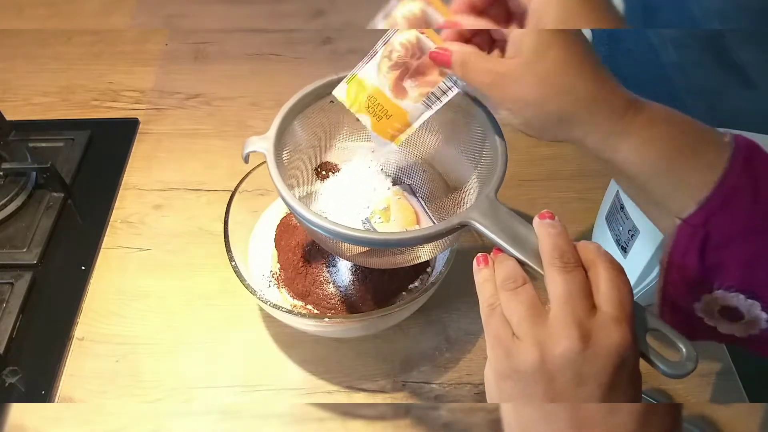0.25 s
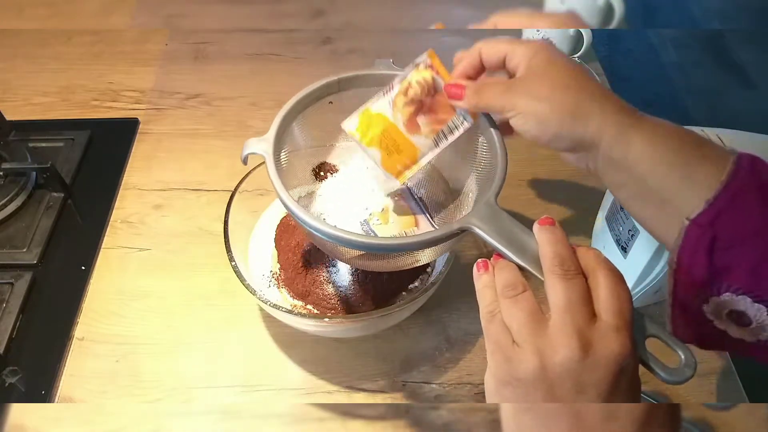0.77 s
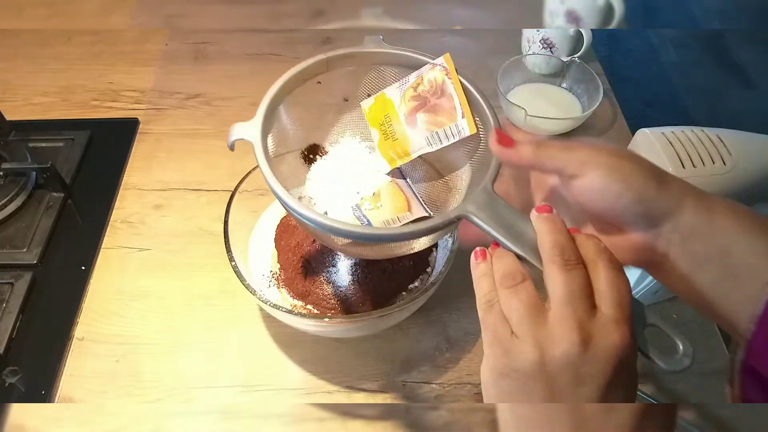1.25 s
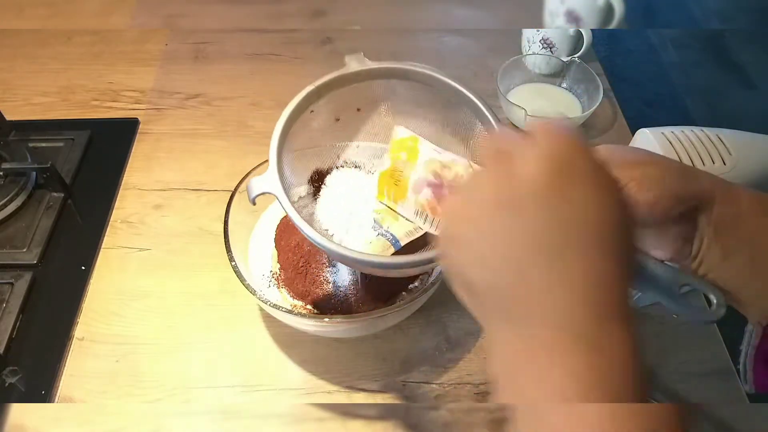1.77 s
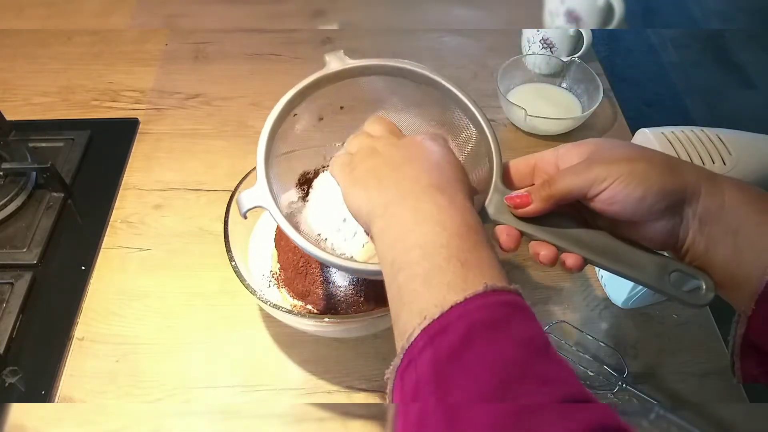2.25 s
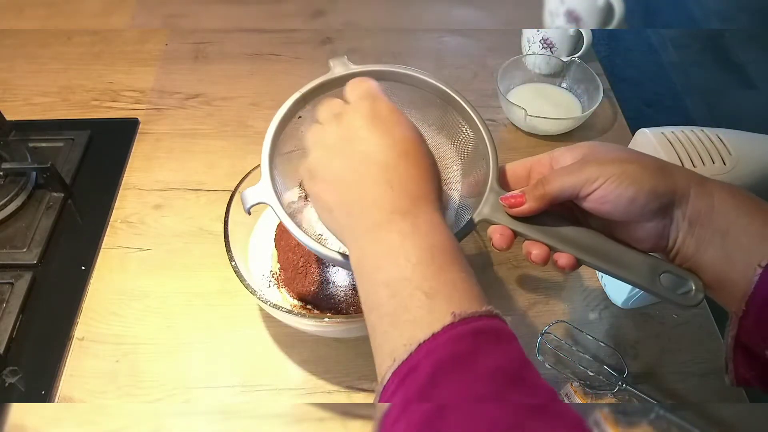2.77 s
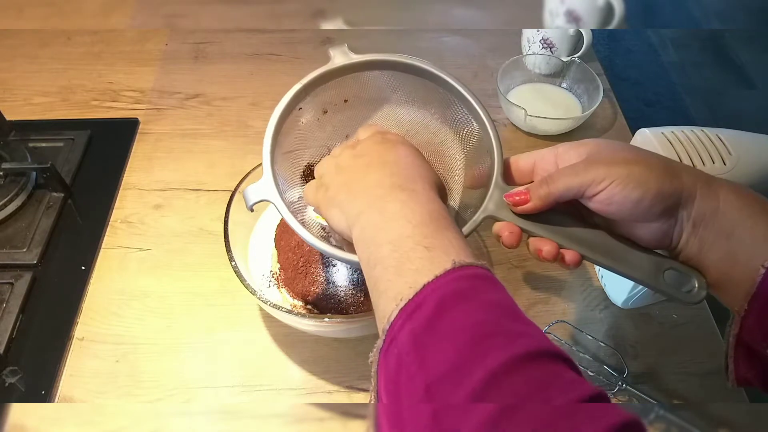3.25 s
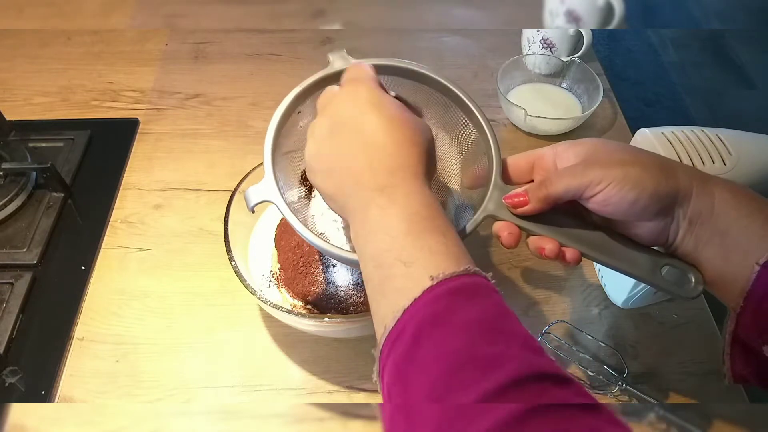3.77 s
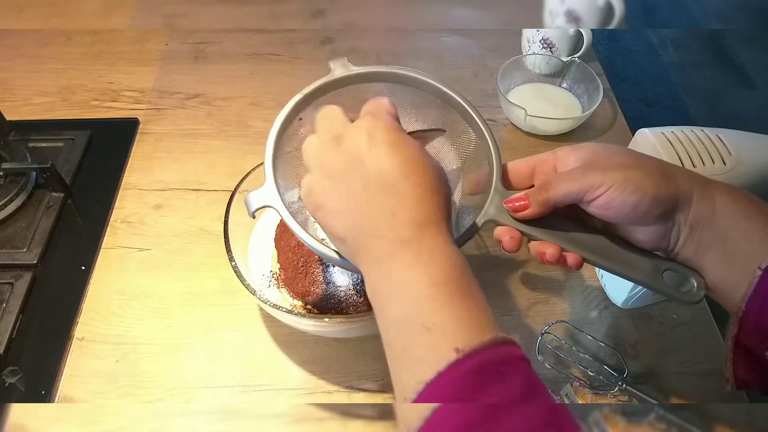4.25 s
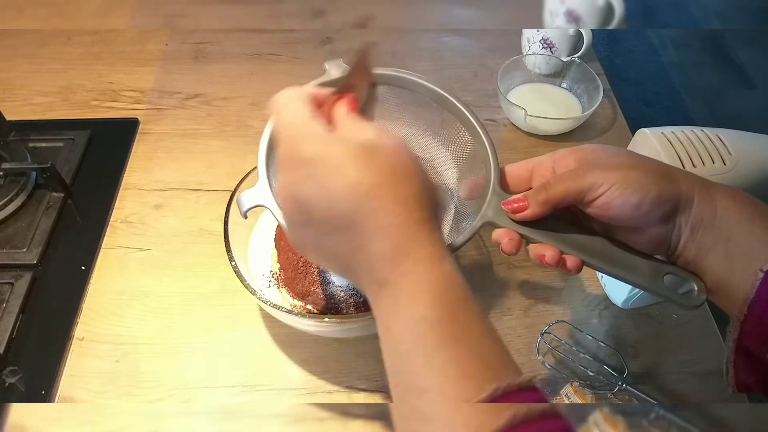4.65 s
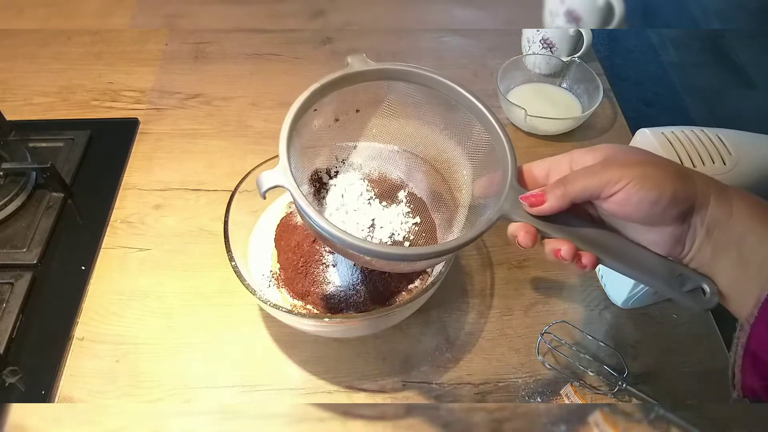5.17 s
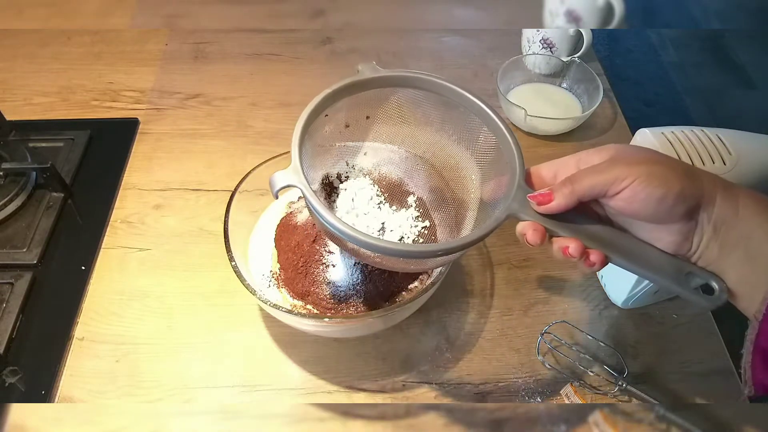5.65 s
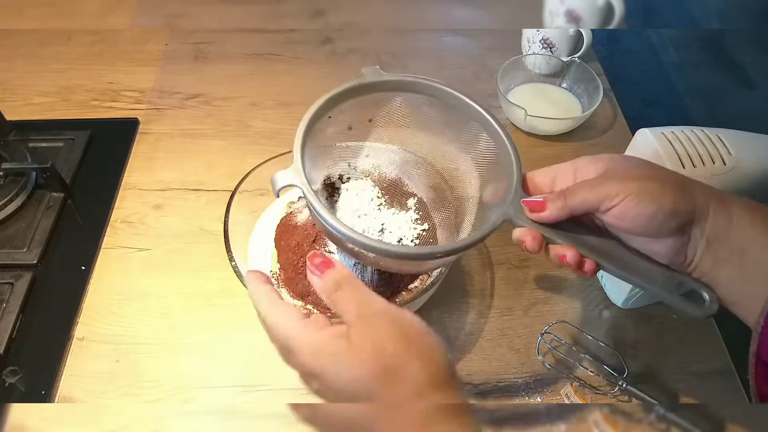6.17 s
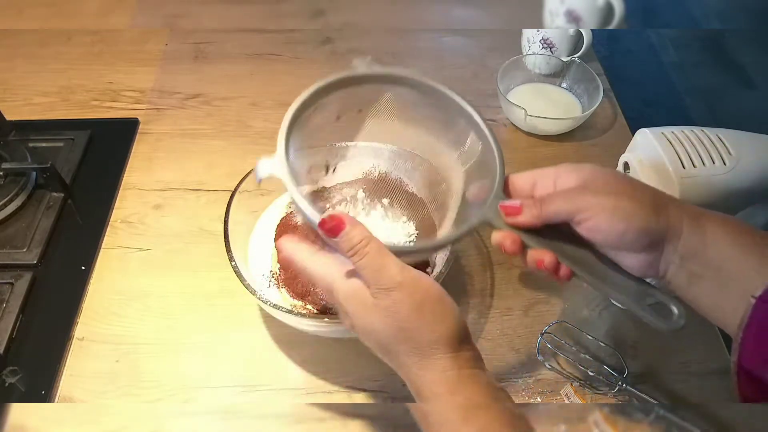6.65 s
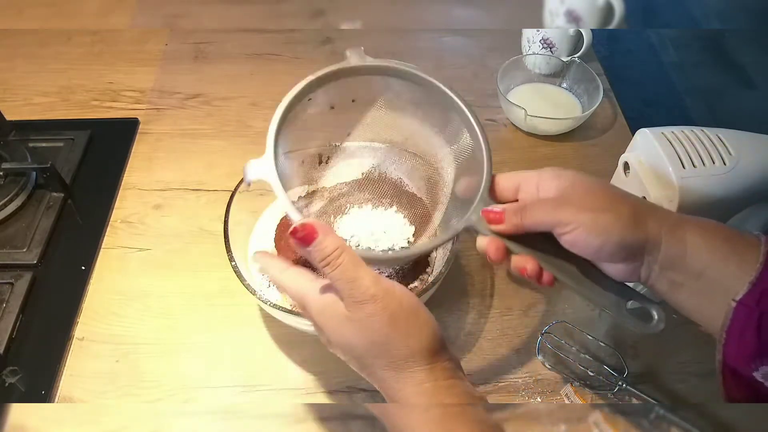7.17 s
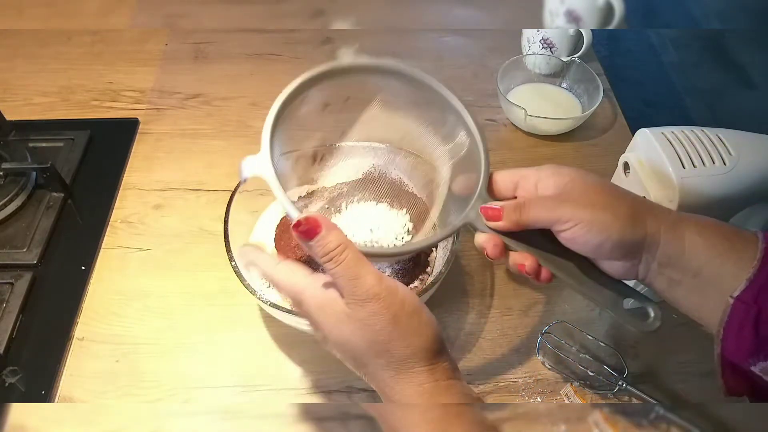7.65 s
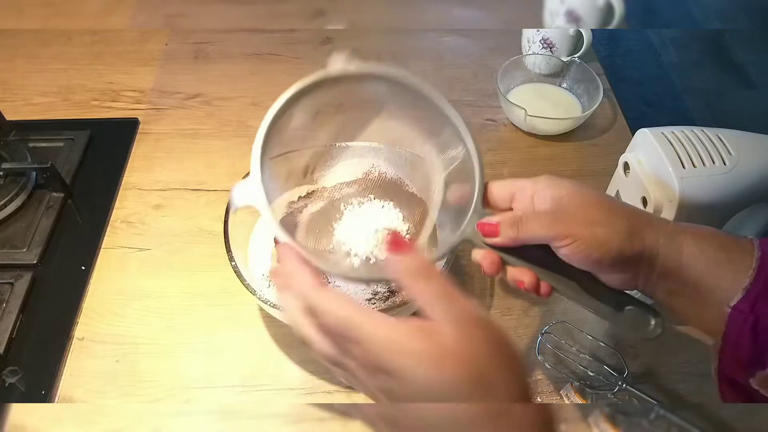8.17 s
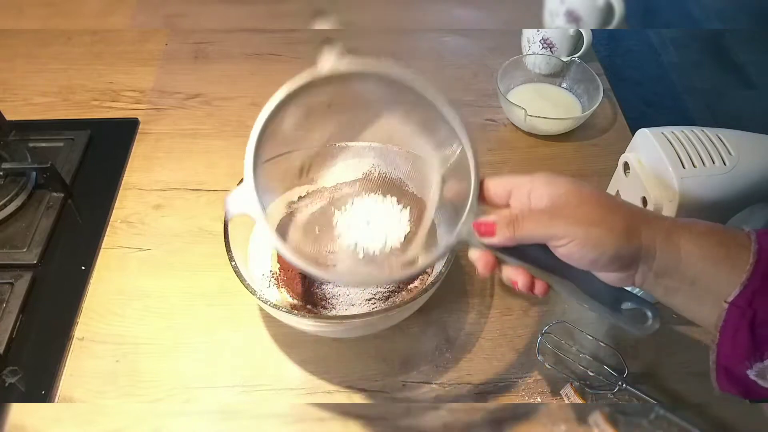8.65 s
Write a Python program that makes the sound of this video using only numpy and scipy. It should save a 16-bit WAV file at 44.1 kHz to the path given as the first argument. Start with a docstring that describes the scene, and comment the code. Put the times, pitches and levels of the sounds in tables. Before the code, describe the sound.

Close up in a quiet kitchen, a small paper packet is shaken with crisp irregular crackles, dropped softly, then rubbed and crumpled hard inside a wire sieve with bright snaps and a few dull knocks. The rustling thins out and stops. After a short pause the sieve is tapped and rocked, dry powder hissing back and forth in quick, even strokes. Faint low hum and a short room tail.

```python
"""A quiet kitchen with a faint mains hum: a small paper packet is shaken, dropped and crumpled in a wire
sieve, then the sieve is rocked and dry powder slides to and fro over the mesh.
Paper and powder are noise grains shaped by spectra and swells, creases are noise bursts each of its own colour,
knocks are dull puffs with ringing sines, and the drumming mesh is a resonance driven by grains.
A close pair of microphone ports hears all this with the tail of the room."""
import sys
import numpy as np
from scipy import signal
from scipy.io import wavfile

SR = 44100
rng = np.random.default_rng(int(sys.argv[2]) if len(sys.argv) > 2 else 0)


def unload_wav(signal):
    """Save mono or channel-first audio to the path in sys.argv[1] as 16-bit WAV at rate SR, clipped to [-1, 1]."""
    wavfile.write(
        sys.argv[1],
        SR,
        np.round(np.clip(np.atleast_2d(signal).T, -1, 1) * 32767).astype(np.int16),
    )


N = 392931

# Background spectrum. Each row: frequency in Hz, relative level in dB.
AIR_SPECTRUM = [(25, -17.5), (60, -6.5), (120, 1.5), (250, -5), (500, -7.5), (1000, -18), (2000, -15),
                (2700, -21), (5000, -21.5), (8800, -17), (10500, -23.5), (15300, -17), (16300, -41)]
# Likeness of the background at the two ports. Each row: frequency in Hz, left-right correlation from 0 to 1.
AIR_LIKENESS = [(60, 1), (180, 0.94), (550, 0.91), (1650, 0.23), (4970, 0.24), (15000, 0.18)]
# Wavering hum. Each row: frequency in Hz, width in Hz, rms level in dB.
HUM_BANDS = [(98.8, 5.8, -75.5), (244.5, 6.1, -86.5)]
AIR_DB = -72  # rms level without the hum

# Creases of the paper snapping over. Each row: start in seconds, level in dB of the part above the lows
# and below the treble (its energy spread over 4 ms), lows below 2.8 kHz against it in dB,
# centre of the burst's own broad colour in Hz.
CREASES = [(0.042, -29, -4.5, 5730), (0.13, -34, 5.5, 3550), (0.153, -41, -1, 3720), (.333, -46, 5.5, 2200),
           (.355, -39.5, -8, 2080), (0.3934, -23, -8.5, 4850), (0.4569, -39, -9.5, 4440),
           (.4624, -39, -19, 5060), (0.5018, -35, 3.5, 3860), (0.5205, -31.5, -13, 8800),
           (0.5321, -30.5, -8, 4220), (0.577, -40, -15, 4100), (.5975, -38, -37, 4170),
           (.631, -58, 4, 1450), (.667, -51.5, -3, 3730), (0.7358, -48.5, -33, 4350),
           (.786, -40.5, -17, 7900), (0.8662, -26, -12, 8550), (0.917, -47, 0, 8850),
           (1.0072, -44, -34, 8250), (1.036, -43.5, -14, 6650), (1.105, -50.5, -20, 7700),
           (1.14, -48, -10, 5650), (1.161, -45.5, -13, 4970), (1.188, -47.5, -16, 5200),
           (1.261, -51, -31, 7400), (1.3, -48, -28, 7100), (1.8354, -51, -32, 9400),
           (1.85, -50, -19.5, 7100), (2.22, -30.5, -10, 4400), (2.2507, -17.5, -13, 4700),
           (2.2701, -21.5, -2, 8340), (2.285, -30, -12, 6500), (2.298, -23, -21, 8200),
           (2.325, -24.5, -35, 6950), (2.547, -42, -12, 9300), (2.577, -43, 0.5, 8400),
           (2.702, -42.5, -10.5, 9000), (2.734, -41, -17.5, 6350), (2.781, -43, -19.5, 6300),
           (2.8405, -41.5, -14.5, 1730), (2.894, -18, -5.5, 5400), (2.8985, -26.5, -5, 5570),
           (2.9665, -31.5, -11, 9150), (2.9934, -25.5, -5.5, 8840), (3.0043, -19.5, -7.5, 8240),
           (3.187, -30, -9.5, 8060), (3.219, -37, -7, 8600), (3.2569, -48, 6.5, 2160),
           (3.266, -44, -26, 4040), (3.2856, -39.5, -5.5, 8750), (3.3353, -42, -21, 4540),
           (3.343, -34.5, -53, 1850), (3.358, -43, -13, 5960), (3.3826, -28.5, -10, 5640),
           (3.404, -42, -13, 5460), (3.4295, -43, 1, 7500), (3.445, -39, -7, 4200), (3.476, -30, -3, 5960),
           (3.5019, -30, -10.5, 4570), (3.551, -38, 4.5, 4270), (3.5814, -48.5, 10.5, 4480),
           (3.596, -40, -9, 5500), (3.626, -43, -26, 6900), (3.655, -53.5, 12, 2100),
           (3.776, -35.5, -18, 2950), (3.846, -47, -0.5, 6650), (4.233, -50, -18, 6640),
           (4.454, -46, -15, 6960), (4.519, -37, -5.5, 2960), (4.5461, -25.5, -8.5, 9260),
           (4.5889, -34, -2.5, 6840), (4.7607, -51.5, -18, 7200), (4.8577, -38.5, -21.5, 7870),
           (5.04, -44.5, -19, 8950), (5.118, -42, -13, 5460), (5.394, -42.5, -22, 7800),
           (5.409, -57, -30, 6140), (5.445, -49, -22, 8150), (5.473, -48, -18, 9430),
           (5.4993, -49.5, -4.5, 7940), (5.618, -49, -23.5, 7500)]
# Spectrum of rustling paper. Each row: frequency in Hz, gain in dB.
PAPER_SPECTRUM = [(30, -65), (100, -49.5), (300, -45), (700, -36.5), (1380, -15.5), (2050, -9),
                  (2500, -11.5), (4420, 2), (6500, 5.5), (8800, 6), (10000, -4), (12700, -2),
                  (15300, -11.5), (16300, -23.5)]
# Treble of the packet above 9.8 kHz. Each row: time in seconds, level against the middle band in dB.
PAPER_TREBLE = [(.1, -9.5), (.9, -11), (1.35, -4.5), (1.7, -7.5), (2.2, -9.5), (2.6, -6.5), (3.1, -6.5),
                (3.5, -10), (4.0, -5), (4.5, -3), (4.9, -7.5), (5.7, -4.5)]
SNAP_S, SNAP_TREBLE_DB = 0.0023, -1  # time constant of the burst; its treble against the rustle's
COLOUR_WIDTH_HZ = 1200  # each burst has its own broad colour

# Rubs and rustles of the packet. Each row: peak time in seconds, peak level of the middle band in dB,
# fall time in seconds, lows below 2.8 kHz against the middle band in dB.
RUBS_OF_PACKET = [(.06, -54, 0.0067, -2), (.09, -48, 0.015, -2), (.19, -54.5, 0.022, -13),
                  (0.335, -50, 0.0087, -6), (.405, -51, 0.011, -13), (.461, -41, 0.01, -8),
                  (.53, -47, 0.039, -5), (.58, -42, 0.031, -1.5), (.666, -48, 0.0079, -15),
                  (0.796, -46, 0.0052, -7.5), (.92, -52, 0.052, -12), (1.015, -49.5, 0.023, -28),
                  (1.1, -65, 0.013, -25), (1.155, -53, 0.0081, -3.5), (1.195, -56, 0.029, -7.5),
                  (1.256, -53, 0.0073, -19), (1.301, -55, 0.026, -30), (1.432, -65, 0.04, -20),
                  (1.489, -63.5, 0.014, -13), (1.62, -61, 0.055, -23), (1.676, -50.5, 0.028, -14),
                  (1.765, -45.5, .016, -14.5), (1.85, -58, 0.037, -26), (1.975, -66, 0.015, -15),
                  (2.039, -59, .01, -18), (2.087, -51, 0.034, -13), (2.184, -45.5, 0.014, -11.5),
                  (2.235, -40.5, 0.011, 1.5), (2.28, -42.5, .015, -1), (2.33, -38.5, 0.035, -5.5),
                  (2.45, -52, 0.079, -13.5), (2.566, -36, 0.017, -8), (2.66, -52.5, 0.067, -15),
                  (2.74, -44, 0.015, -9.5), (2.81, -48, 0.033, -4.5), (2.95, -41.5, 0.047, -7.5),
                  (3.05, -46, 0.043, -15), (3.24, -49, 0.033, -4), (3.347, -37.5, 0.011, -3),
                  (3.444, -38, 0.014, -4.5), (3.5, -43, 0.0093, 3), (3.579, -43.5, 0.034, -4),
                  (3.68, -50, 0.072, -5.5), (3.75, -45.5, 0.017, -8), (3.853, -57, 0.039, -25),
                  (3.929, -50, 0.029, -9.5), (4.067, -51, 0.025, -11), (4.16, -65.5, 0.037, -12),
                  (4.242, -56.5, 0.024, -13.5), (4.33, -64.5, 0.047, -11), (4.469, -51.5, 0.021, -7),
                  (4.6, -58, 0.048, -3.5), (4.7, -59, .033, -21), (4.92, -66, 0.019, -24),
                  (4.998, -47.5, 0.029, -15), (5.06, -56, 0.025, -16), (5.135, -49.5, 0.033, -14.5),
                  (5.236, -51, 0.026, -15.5), (5.358, -50, 0.012, -15), (5.44, -56.5, 0.02, -25),
                  (5.486, -49.5, .011, -14), (5.572, -62, 0.014, -11), (5.625, -60, 0.017, -32),
                  (5.685, -66, 0.03, -12), (5.74, -68, 0.017, -8), (6.02, -76, .026, -9)]
# Hollow of the folded packet. Each row: time in seconds, pitch in Hz, level against the middle band in dB.
POCKET_PITCH = [(.1, 3750, -8), (.6, 3770, -5.5), (.95, 4040, -3), (1.3, 5900, -16), (1.6, 1850, -23),
                (2.6, 1920, -31), (2.95, 2370, -13), (3.55, 1980, -22), (3.75, 2900, -10), (3.82, 3070, -5),
                (4.1, 3670, -34), (4.5, 3100, -19), (5.0, 2940, -18.5), (5.14, 2470, -11), (5.3, 2280, -35),
                (5.45, 1950, -10.5), (5.75, 1800, -18)]
RUB_RISE = 0.83  # rise as a share of the fall

# Decay of the room. Each row: frequency in Hz, time to fall by 60 dB in seconds.
KITCHEN_DECAY = [(500, 0.27), (2000, 0.32), (8000, 0.34), (15000, 0.22)]

# Dull knocks of sieve and hand. Each row: start in seconds, level in dB, relative level of the frame ring in dB.
KNOCKS_OF_SIEVE = [(1.145, -51.5, -10), (2.272, -60, -8), (2.342, -44.5, -20), (2.556, -56, 8.5),
                   (2.894, -57, -16), (3.249, -53.5, -2), (3.335, -55, 0), (3.359, -52, -3),
                   (3.475, -53.5, 0), (3.497, -67, -4), (3.588, -50, -10), (4.516, -71, 10),
                   (4.587, -66.5, -11.5), (6.367, -57.5, 3.5), (6.566, -64, -1)]
# Ringing modes of the sieve frame. Each row: frequency in Hz, relative level in dB, time to fall by 60 dB in seconds.
FRAME_MODES = [(330, -9.5, 0.13), (430, -2.5, 0.071), (585, -7.5, 0.031)]
# Spectrum of the dull puff. Each row: frequency in Hz, gain in dB.
THUD_SPECTRUM = [(60, -25.5), (200, -9), (500, 7), (900, -12), (2000, -43)]

# The hand pushes the packet into the mesh. Each row: peak time in seconds, peak level in dB.
PRESSES = [(2.269, -43), (2.598, -67.5), (2.895, -63), (3.005, -59.5), (3.19, -61), (3.27, -60.5),
           (3.366, -56.5), (3.5, -60), (3.602, -54)]
PRESS_RISE_S, PRESS_FALL_S = 0.017, 0.039

# Rocks of the sieve, each throwing the powder across and back. Each row: peak time in seconds, peak level
# in dB, time to the slide back in seconds, level of the slide back against the first in dB.
ROCKS_OF_SIEVE = [(6.379, -54, .03, -3.5), (6.569, -49.5, 0.056, -9), (6.727, -50, 0.047, -0.5),
                  (6.874, -51, 0.053, 0), (7.042, -49.5, 0.042, -1), (7.202, -47, 0.049, -3),
                  (7.363, -49, 0.044, -4.5), (7.525, -51, 0.048, 0.5), (7.692, -49, 0.058, 0),
                  (7.849, -48, 0.044, -5.5), (8.008, -51, 0.057, -0.5), (8.157, -55, 0.052, -1),
                  (8.292, -52, 0.068, 0), (8.442, -51.5, 0.073, -1.5), (8.604, -53, 0.073, 2.5),
                  (8.77, -54, 0.059, -7.5)]
# Spectrum of sliding powder. Each row: frequency in Hz, gain in dB.
POWDER_SPECTRUM = [(1500, -28), (2300, -16.5), (3850, 4.5), (5700, 4.5), (6600, 0), (8800, 5.5),
                   (10000, -5), (13000, -6.5), (14500, -15.5), (16000, -54)]
SLIDE_RISE_S, SLIDE_FALL_S = 0.017, 0.021
JOLT_S, JOLT_RISE_S = 6.362, 0.0062  # a blow of the hand starts the powder at once

# Port resonances. Each row: frequency in Hz, width in Hz, share added at the left and taken at the right.
PORT_MODES = [(1900, 590, 0.3), (9100, 1200, 0.15), (9600, 1100, -0.4)]
EDGE_HZ = 16600  # upper band limit


def gain_of(db):
    """Level law: decibels become an amplitude factor."""
    return 10 ** (np.asarray(db) / 20)


def evened(x):
    """Normalisation by power: scales to rms 1."""
    return x / np.sqrt(np.mean(x ** 2) + 1e-20)


def read(points, hz):
    """Logarithmic frequency scale: interpolates a table over it."""
    f, value = np.transpose(points)
    return np.interp(np.log(hz + 1), np.log(f + 1), value)


def over_time(points):
    """Linear interpolation: a table of times and values becomes a curve over the samples."""
    return np.interp(np.arange(N) / SR, *np.transpose(points))


def resonate(x, hz, width):
    """Resonance by heterodyning: shifts hz (fixed or a curve) to zero, smooths twice, shifts back; peak gain 1."""
    turn = np.exp(2j * np.pi * np.cumsum(hz * np.ones(len(x))) / SR)
    r = np.exp(-np.pi * width / SR)
    smoothed = signal.lfilter([(1 - r) ** 2], [1, -2 * r, r ** 2], x / turn)
    return 2 * (turn * smoothed).real


def coloured(x, points):
    """Minimum-phase filtering: a causal response with the table's shape; white noise keeps its rms."""
    log_gain = np.log(gain_of(read(points, abs(np.fft.fftfreq(2048, 1 / SR)))))
    # the Hilbert transform of the log gain gives the minimum phase
    taps = np.fft.ifft(np.exp(np.conj(signal.hilbert(log_gain)))).real[:1024]
    return signal.oaconvolve(x, taps / np.linalg.norm(taps))[:len(x)]


def swells(rows, lift_db=0):
    """Addition of powers: sums smooth swells of own rise and fall time; returns the amplitude."""
    t = np.arange(0, N, 32) / SR
    power = 1e-20
    for (s, db, rise, fall), lift in zip(rows, lift_db + np.zeros(len(rows))):
        u = (t - s) / np.where(t < s, max(rise, .002), max(fall, .002))
        power = power + gain_of(2 * (db + lift)) / np.cosh(np.clip(u, -30, 30)) ** 2
    return np.interp(np.arange(N) / SR, t, np.sqrt(power))


def thirds(x):
    """Band splitting: the low, the middle and the high part of a sound, each at rms 1."""
    edges = [(2800, "low"), ([2800, 9800], "band"), (9800, "high")]
    filters = [signal.butter(3, hz, kind, fs=SR, output="sos") for hz, kind in edges]
    return [evened(signal.sosfilt(sos, x)) for sos in filters]


def grit(per_s, spread_db, grain_s, hiss):
    """Random impulse process: tiny decaying noise grains of uneven size over an even hiss."""
    sizes = gain_of(spread_db * np.minimum(rng.exponential(1, N), 3))
    grains = sizes * (rng.random(N) < per_s / SR)
    puff = np.exp(-np.arange(400) / (grain_s * SR))
    envelope = evened(signal.oaconvolve(grains, puff)[:N]) + hiss
    return evened(envelope * rng.standard_normal(N))


def air():
    """Partial coherence: room rumble is alike at both ports, microphone hiss unlike; the hum is shared."""
    a, b = np.fft.rfft(rng.standard_normal((2, N)))
    hz = np.fft.rfftfreq(N, 1 / SR)
    same = np.clip(read(AIR_LIKENESS, hz), 0, 1)
    both = np.array([a, same * a + np.sqrt(1 - same ** 2) * b]) * gain_of(read(AIR_SPECTRUM, hz))
    hum = sum(gain_of(db) * evened(resonate(rng.standard_normal(N), f, w)) for f, w, db in HUM_BANDS)
    return gain_of(AIR_DB) * evened(np.fft.irfft(both, N)) + hum


def snaps():
    """Buckling: each crease gives way in a burst of micro-cracks of its own broad colour, then settles."""
    out, t = np.zeros(N + 4096), np.arange(4096) / SR
    sharp = np.exp(-(t / SNAP_S) ** 2)
    settling = gain_of(-16.5) * np.exp(-t / 0.026)
    for (s, db, full_db, hz), cracks in zip(CREASES, rng.standard_normal((len(CREASES), 4096))):
        cracks = cracks * np.minimum(t / 0.001, 1)
        low, middle, high = thirds(coloured(cracks * (sharp + settling), PAPER_SPECTRUM))
        own_colour = evened(resonate(cracks * sharp, hz, COLOUR_WIDTH_HZ))
        body = evened(middle + 0.75 * own_colour)
        treble_db = SNAP_TREBLE_DB + np.interp(s, *np.transpose(PAPER_TREBLE))
        snap = gain_of(full_db) * low + body + gain_of(treble_db) * high
        spread = np.sqrt(.004 * SR / 4096)  # the level counts as if the energy filled 4 ms
        out[round(s * SR):][:4096] += gain_of(db) * spread * snap
    return out[:N]


def rustle():
    """Friction and cavity resonance: small creases and paper dragging over wire; the pocket's pitch shifts."""
    crackle = grit(per_s=450, spread_db=3.5, grain_s=0.0025, hiss=0.44)
    lone_ticks = grit(per_s=90, spread_db=2.0, grain_s=0.0007, hiss=0)
    crackle = evened(crackle + gain_of(-8.0) * lone_ticks)
    low, middle, high = thirds(coloured(crackle, PAPER_SPECTRUM))
    s, hz, pocket_db = np.transpose(POCKET_PITCH)
    hollow = evened(resonate(crackle, over_time(np.transpose([s, hz])), 600))
    pocket = gain_of(over_time(np.transpose([s, pocket_db]))) * hollow
    treble = gain_of(over_time(PAPER_TREBLE)) * high
    rubs = [(s, db, RUB_RISE * fall, fall) for s, db, fall, _ in RUBS_OF_PACKET]
    full_db = np.array(RUBS_OF_PACKET)[:, -1]
    return low * swells(rubs, full_db) + (middle + treble + pocket) * swells(rubs)


def kitchen(x):
    """Reverberation: a dense tail, each band dying at its own speed, kept even by passing among three like tails."""
    out = np.zeros((2, N))
    t = np.arange(SR // 2) / SR
    turn = np.arange(N) / SR * 25  # radians: the sound passes steadily among the tails
    for k, (shared, own) in enumerate(rng.standard_normal((3, 2, SR // 2))):
        taps = np.array([shared + 0.18 * own, shared - 0.2 * own]) * np.clip(t / 0.0042, 0, 1)
        hz, frame_s, z = signal.stft(taps, SR, nperseg=256)
        decay = gain_of(-60 * frame_s / read(KITCHEN_DECAY, hz)[:, None])
        tail = signal.istft(z * decay, SR, nperseg=256)[1]
        share = np.sqrt(2 / 3) * np.cos(turn + k * np.pi / 3)  # the squares sum to 1
        out += signal.fftconvolve(share * x[None], tail / np.linalg.norm(tail[0]), axes=1)[:, :N]
    return out


def knocks():
    """Impact and modal decay: a soft blow gives a dull puff, and the frame of the sieve rings briefly."""
    out, t = np.zeros(N + 4096), np.arange(4096) / SR
    ring = sum(gain_of(db - 60 * t / t60) * np.sin(2 * np.pi * hz * t) for hz, db, t60 in FRAME_MODES)
    noises = rng.standard_normal((len(KNOCKS_OF_SIEVE), 4096))
    for (s, db, ring_db), air_push in zip(KNOCKS_OF_SIEVE, noises):
        thud = 0.12 * evened(coloured(air_push * np.exp(-t / 0.027), THUD_SPECTRUM))
        knock = (thud + gain_of(ring_db) * ring) * np.minimum(t / .003, 1)
        out[round(s * SR):][:4096] += gain_of(db) * knock
    return out[:N]


def drumming():
    """Forced resonance: the hand presses the packet into the mesh, which drums dully."""
    mesh = resonate(grit(per_s=290, spread_db=2.0, grain_s=0.002, hiss=0.21), 1300, 970)
    presses = [(s, db, PRESS_RISE_S, PRESS_FALL_S) for s, db in PRESSES]
    return swells(presses) * evened(mesh)


def powder():
    """Granular flow: each slide swells and fades; the grains are so many that they hiss."""
    across = [(s, db, SLIDE_RISE_S, SLIDE_FALL_S) for s, db, _, _ in ROCKS_OF_SIEVE]
    back = [(s + later, db + back_db, SLIDE_RISE_S, SLIDE_FALL_S) for s, db, later, back_db in ROCKS_OF_SIEVE]
    started = np.clip((np.arange(N) / SR - JOLT_S) / JOLT_RISE_S, 0, 1)
    grains = grit(per_s=690, spread_db=2.5, grain_s=0.0045, hiss=0.93)
    return started * swells(across + back) * coloured(grains, POWDER_SPECTRUM)


def scene():
    """Superposition: everything happens at one spot on the worktop, with the room's tail and the air added."""
    near = snaps() + rustle() + knocks() + drumming() + powder()
    return near + gain_of(-8.0) * kitchen(near) + air()


def record(dry):
    """Receiver resonance: the ports resonate a little differently; then the band limit."""
    middle = dry.mean(0)
    apart = sum(share * signal.lfilter(*signal.iirpeak(hz, hz / width, SR), middle)
                for hz, width, share in PORT_MODES)
    heard = dry + np.array([apart, -apart])
    band_limit = signal.firwin(511, EDGE_HZ, window=("kaiser", 9), fs=SR)
    return signal.oaconvolve(heard, band_limit[None], "same")


dry = scene()
out = record(dry)
unload_wav(out)
```